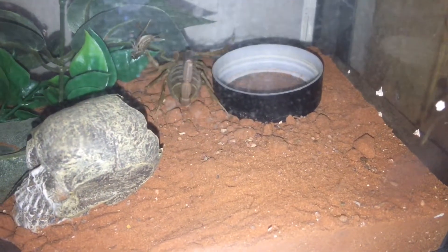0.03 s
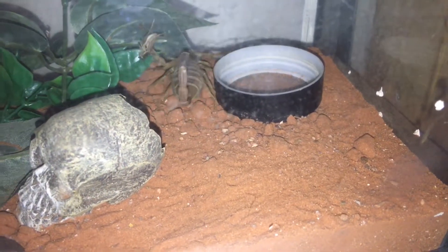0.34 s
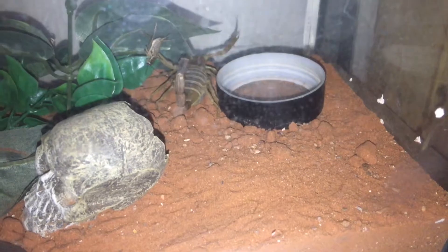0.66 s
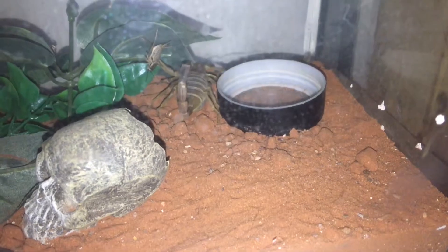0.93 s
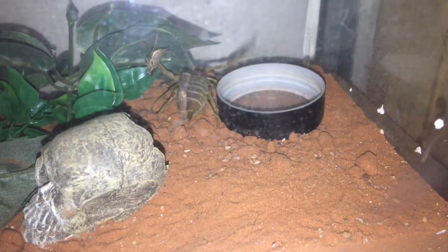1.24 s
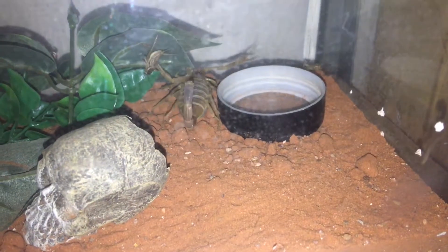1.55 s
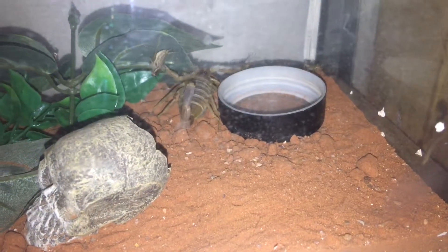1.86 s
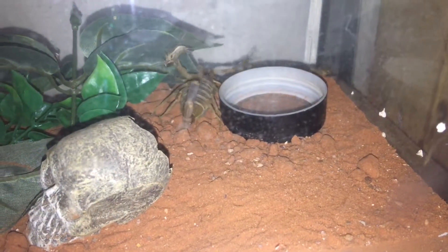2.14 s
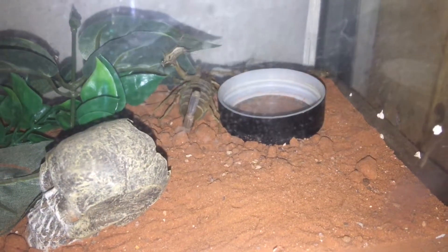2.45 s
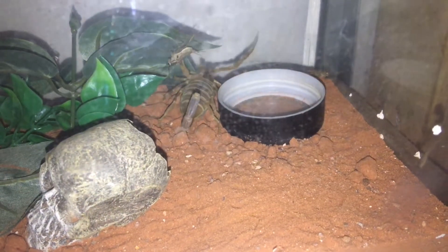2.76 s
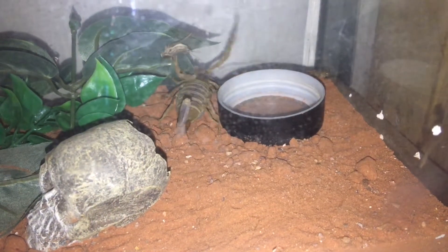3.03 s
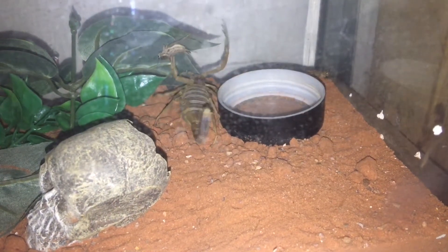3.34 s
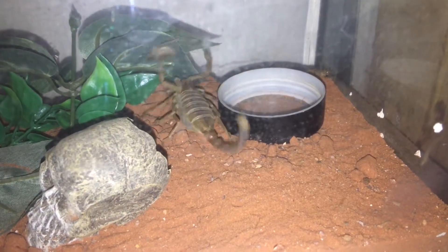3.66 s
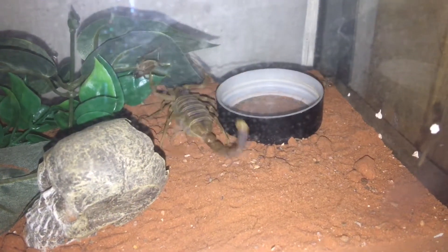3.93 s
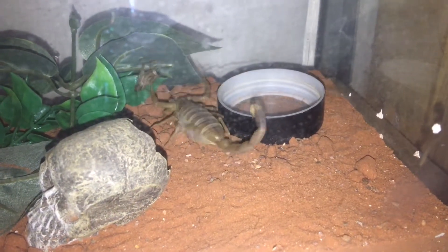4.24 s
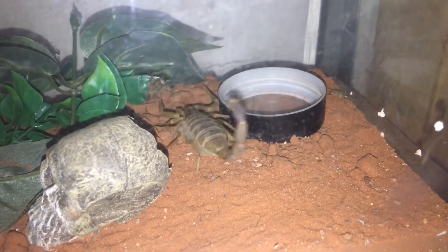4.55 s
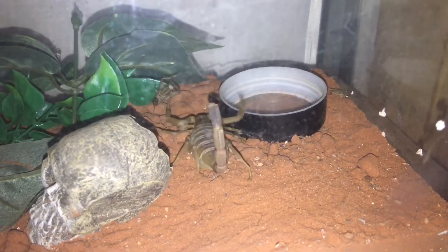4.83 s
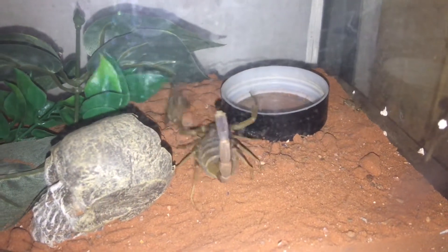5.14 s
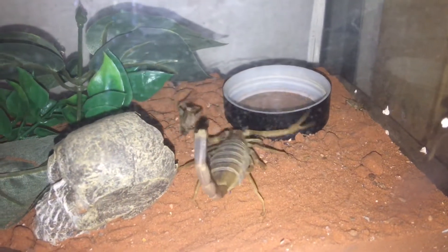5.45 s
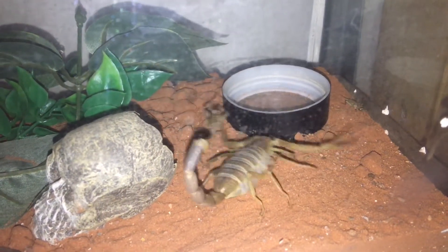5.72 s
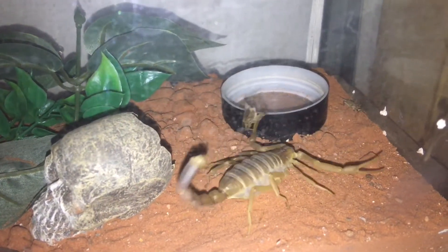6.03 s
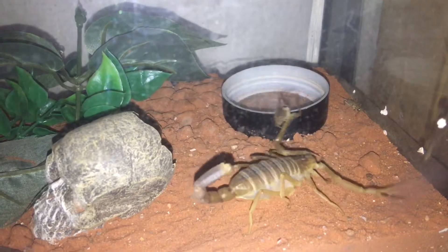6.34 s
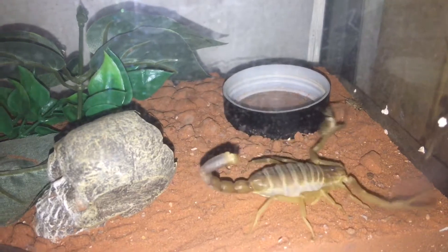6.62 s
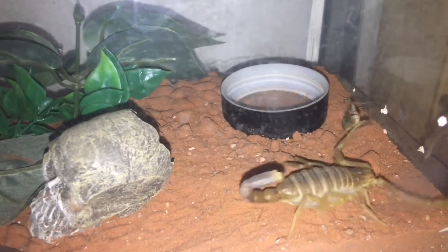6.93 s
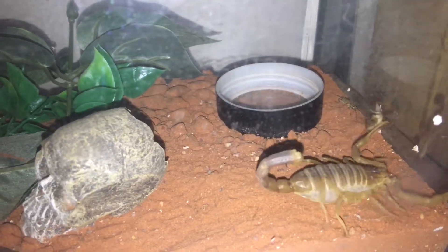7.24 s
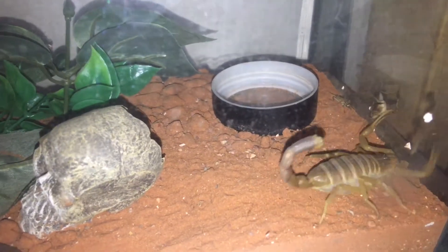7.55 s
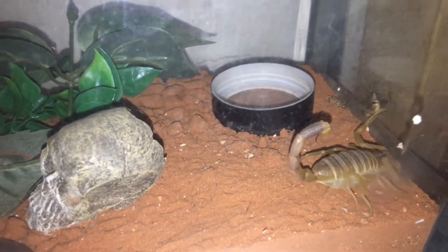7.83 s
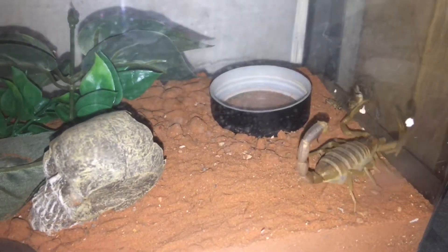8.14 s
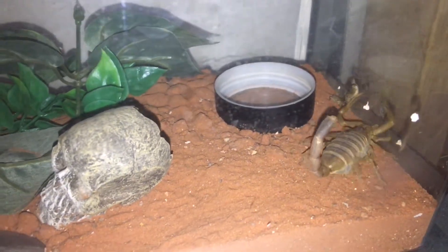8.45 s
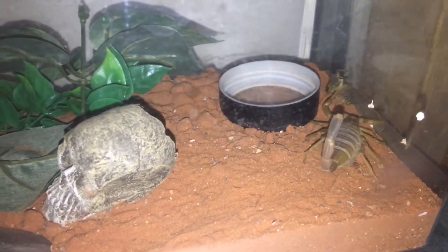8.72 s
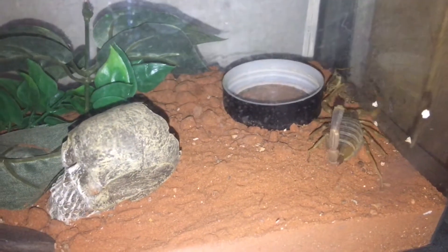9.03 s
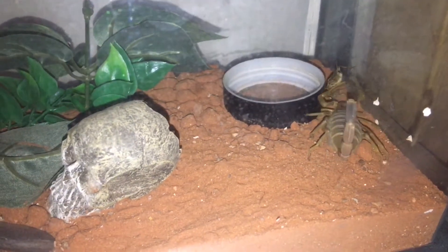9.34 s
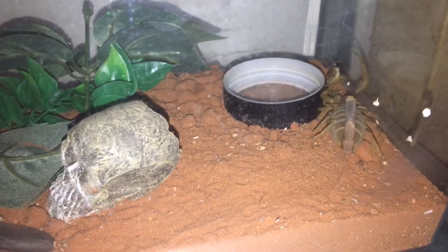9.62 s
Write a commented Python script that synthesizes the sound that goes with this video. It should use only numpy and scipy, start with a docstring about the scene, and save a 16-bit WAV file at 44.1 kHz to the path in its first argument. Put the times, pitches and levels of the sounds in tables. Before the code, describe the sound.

Faint clicks and scratches of a scorpion walking over plastic leaves and sand in a glass terrarium, under a low, throbbing motor hum.

```python
"""A motor's throbbing hum and faint whines fill a quiet room, over dull air noise and a soft electronic hiss.
A scorpion walks in a glass terrarium: its legs scrape and tap plastic leaves, a water dish and the wall,
and its body drags through dry sand. Each touch is a burst of tiny slips that makes the thing touched
resonate, and the glass walls make it linger. The electronics tick very softly, one hollow bump passes
early on, and later the claws set the dish and the wall ringing briefly."""
import sys
import numpy as np
from scipy import signal
from scipy.fft import rfft, irfft
from scipy.io import wavfile
from scipy.ndimage import uniform_filter1d

SR = 44100
rng = np.random.default_rng(int(sys.argv[2]) if len(sys.argv) > 2 else 0)


def int16_out(signal):
    """Quantize to a 16-bit WAV file."""
    q = np.round(np.clip(np.atleast_2d(signal).T, -1, 1) * 32767)
    wavfile.write(sys.argv[1], SR, q.astype(np.int16))


N = 431298
TIME = np.arange(N) / SR
MOTOR_HZ = 58.06   # how fast the motor turns

# Legs sliding along a leaf or the dish.
# Each row: start in seconds, length in seconds, relative level in dB, brightness in dB.
LEG_SLIDES = [(0.004, 0.021, -61.5, -7), (0.04, 0.017, -64, -5), (0.076, 0.072, -66, 8),
              (2.047, 0.052, -55, 7), (2.11, 0.072, -69, 3), (3.936, 0.02, -56.5, -3),
              (3.959, 0.044, -62.5, 8), (4.139, 0.044, -59, -5)]


def from_db(db):
    """Turn decibels into a number to multiply by."""
    return 10 ** (np.asarray(db) / 20)


def rms_one(x):
    """Scale a sound so that its average strength (rms) is 1."""
    return x / np.sqrt(np.mean(x ** 2) + 1e-30)


def add(out, s, sound):
    """Mix a short sound in, starting at s seconds."""
    at = int(np.clip(round(s * SR), 0, N - 1))
    out[at:at + len(sound)] += sound[:N - at]


def colour(x, spectrum):
    """Make some pitches louder and others softer, along a curve of (Hz, dB) points."""
    hz, db = np.transpose(spectrum)
    bin_hz = np.maximum(np.arange(N // 2 + 1) * SR / N, 1)
    gain = from_db(np.interp(np.log(bin_hz), np.log(hz), db))
    return irfft(rfft(x) * gain, N)


def resonate(x, hz, width_hz):
    """A resonance: pitches near hz pass and the rest are weakened."""
    r = np.exp(-np.pi * width_hz / SR)
    feedback = [1, -2 * r * np.cos(2 * np.pi * hz / SR), r * r]
    return signal.lfilter([(1 - r * r) / 2, 0, (r * r - 1) / 2], feedback, x + 1e-18)


def resonances(x, modes):
    """Several steep resonances side by side, scaled so that white noise would keep its power."""
    def through(sound):
        return sum(from_db(db) * resonate(resonate(sound, hz, 1.5 * width), hz, 1.5 * width)
                   for hz, width, db in modes)
    return through(x) / np.linalg.norm(through(signal.unit_impulse(2048)))


def tone(hz):
    """A steady, pure tone with an average strength of 1."""
    return np.sqrt(2) * np.sin(2 * np.pi * (hz * TIME + rng.random()))


def rumble(hz, width_hz):
    """Random shaking in one resonance makes a wavering pitch."""
    noise = resonate(resonate(rng.standard_normal(N + SR), hz, width_hz), hz, width_hz)
    return rms_one(noise[SR:])   # skip the second in which it builds up


def even_out(x):
    """Smooth a sound's loudness while its pitch keeps wavering."""
    power = uniform_filter1d(np.abs(signal.hilbert(x)) ** 2, size=2600)
    return rms_one(x / np.sqrt(power + .04 * power.mean()))


def motor_hum(hum_db=-1.0, shake_db=-6.0, flutter_db=-5.5, octave_db=-52.0, octave_follows=0.79):
    """The motor's tone swells and sinks, throbbing against its own rumble; a higher rumble follows."""
    # The swells of the deep hum. Each row: time in seconds, relative level in dB.
    swells = [(0.02, -40), (0.07, -37.5), (1.23, -43), (1.26, -52), (1.4, -35.5), (1.67, -45.5),
              (1.77, -36.5), (1.96, -43), (2.83, -40.5), (2.88, -38), (3.61, -41.5), (3.67, -48),
              (4.34, -33.5), (4.88, -47.5), (5.07, -38), (5.18, -46), (5.37, -35.5), (5.5, -36.5),
              (5.61, -58.5), (5.75, -35.5), (6.23, -44.5), (6.58, -37.5), (6.64, -62), (6.74, -41.5),
              (7.21, -40), (7.31, -54), (7.37, -36.5), (8.28, -46.5), (8.31, -36.5), (8.83, -35),
              (8.96, -44), (9.07, -34.5), (9.48, -43), (9.72, -44)]
    level_db = np.interp(TIME, *np.transpose(swells))
    core = even_out(tone(MOTOR_HZ) + from_db(shake_db) * rumble(hz=60.0, width_hz=14.3))
    flutter = from_db(flutter_db) * rumble(hz=56.46, width_hz=14.5)
    low = from_db(hum_db + level_db) * (core + flutter)
    high_db = octave_db + octave_follows * (level_db - level_db.mean())
    high = from_db(high_db) * rumble(hz=112.35, width_hz=23.4)
    return signal.sosfilt(signal.butter(4, [41, 140], "band", fs=SR, output="sos"), low + high)


def whines(buzz_db=-103, buzz_spread_db=1.5, top_hz=4528.7):
    """The motor sings at multiples of its turning rate (harmonics), among other steady tones."""
    # The clear harmonics. Each row: multiple of the turning rate, level in dB.
    harmonics = [(2, -56), (10, -90), (14, -85), (15, -86.5), (16, -86.5), (18, -86), (21, -80.5),
                 (22, -84), (23, -94), (26, -95), (28, -93), (30, -94), (47, -88.5), (71, -94)]
    # Mains hum and other tones; the low ones throb against the second harmonic.
    # Each row: pitch in Hz, level in dB.
    other_tones = [(98.95, -64), (110.2, -56.6), (120, -64), (643.3, -82), (716.7, -81.5), (1075.3, -87)]
    # The highest whine slowly grows. Each row: time in seconds, level in dB.
    top_levels = [(0, -86.5), (4, -86.5), (6, -85.5), (9.7, -82)]
    upper = np.arange(24, 78)   # these harmonics make a faint, uneven buzz
    upper_db = buzz_db + buzz_spread_db * np.clip(rng.standard_normal(len(upper)), -2, 2)
    levels = dict(zip(upper, upper_db)) | dict(harmonics)
    steady = sum(from_db(db) * tone(multiple * MOTOR_HZ) for multiple, db in levels.items())
    steady += sum(from_db(db) * tone(hz) for hz, db in other_tones)
    return steady + from_db(np.interp(TIME, *np.transpose(top_levels))) * tone(top_hz)


def air_and_hiss(air_top_hz=5000):
    """Dull room air drones in a few resonances, and the electronics hiss above it."""
    # The room's air noise. Each row: pitch in Hz, level in dB per Hz.
    air_curve = [(20, -86.5), (40, -74.5), (80, -74), (100, -73.5), (150, -86.5), (200, -88.5), (235, -94),
                 (450, -97.5), (720, -96.5), (1400, -102.5), (2200, -105.5), (2900, -109), (4300, -111),
                 (5000, -113.5)]
    # Resonances in that noise. Each row: pitch in Hz, width in Hz, level in dB.
    air_modes = [(198.6, 17.5, -75.5), (255.3, 8.6, -81.5), (341, 110, -79.5), (560.5, 13, -80.5),
                 (722.6, 30, -78), (1223, 18, -85), (2060, 110, -86.5)]
    # The electronic hiss. Each row: pitch in Hz, level in dB per Hz.
    hiss_curve = [(4000, -135), (5300, -115), (6700, -114.8), (7600, -118), (9400, -116.8), (10500, -122.5),
                  (11200, -119.3), (12200, -117.5), (13200, -113.5), (14300, -115.6), (16000, -116.2)]
    air, hiss = rng.standard_normal((2, N)) * np.sqrt(SR / 2)
    air = signal.sosfilt(signal.butter(6, air_top_hz, fs=SR, output="sos"), colour(air, air_curve))
    drone = sum(from_db(db) * rumble(hz, width) for hz, width, db in air_modes)
    return air + drone + colour(hiss, hiss_curve)


def grains(per_s, spread_db, size):
    """Tiny slips of uneven strength at random moments."""
    slips = rng.random(size) < per_s / SR
    direction = rng.choice([-1, 1], size)
    strength = from_db(spread_db * np.clip(rng.standard_normal(size), -2, 2))
    return rms_one(slips * direction * strength)


def glass_echo(envelope, fade_s=0.089, echo_db=1.0):
    """Sound bouncing between the glass walls leaves a noisy tail that drops 60 dB in fade_s."""
    power_kept = from_db(-120 / (fade_s * SR))
    power = signal.lfilter([1 - power_kept], [1, -power_kept], envelope ** 2)
    return from_db(echo_db) * np.sqrt(power) * rng.standard_normal(len(envelope))


def touched_spot(sound, count=10, range_hz=(1454, 14030), width_hz=116, boost_db=6):
    """Each spot that a leg touches favours a few chance pitches; the sound keeps its energy."""
    pitches = np.exp(rng.uniform(*np.log(range_hz), count))
    rung = sound + from_db(boost_db) * sum(resonate(sound, hz, width_hz) for hz in pitches)
    return rung * np.linalg.norm(sound) / np.linalg.norm(rung)


def scrapes(levels_db, lowest_hz=5170):
    """A sliding leg catches, slips in quick grains and lets go, too light to stir low pitches."""
    out, t = np.zeros(N), TIME[:SR // 6]
    for (s, length, *_), db in zip(LEG_SLIDES, levels_db):
        stroke = np.interp(t / length, [0, .06, .85, 1.15], [0, 1, .8, 0], right=0)
        friction = stroke * grains(per_s=4600, spread_db=4.0, size=len(t))
        add(out, s, from_db(db) * touched_spot(friction + glass_echo(stroke)))
    return signal.sosfilt(signal.butter(6, lowest_hz, "high", fs=SR, output="sos"), out)


def sand(gain_db=10.0, coarse_db=-7.0):
    """Fine sand and a few coarser crumbs roll under the body in soft swells."""
    # The body's drags. Each row: start in seconds, length in seconds, relative level in dB.
    drags = [(0.048,0.096,-79), (0.293,0.035,-82), (1.21,0.11,-83), (1.355,0.18,-77), (7.234,0.18,-79),
             (9.077,0.3,-78.5)]
    # The tone colour of sliding sand. Each row: pitch in Hz, relative level in dB.
    sand_curve = [(400, 13), (1500, 17), (4000, 11), (6500, 9.5), (9000, 7.5), (10500, 4.5), (13000, 7),
                  (15800, -13)]
    push = sum(from_db(db) * np.exp(-(2 * (TIME - s) / length - 1) ** 2) for s, length, db in drags)
    fine = grains(per_s=5200, spread_db=3.5, size=N)
    coarse = from_db(coarse_db) * grains(per_s=540, spread_db=24.0, size=N)
    return from_db(gain_db) * push * rms_one(colour(fine + coarse, sand_curve))


def ticks(starts_s=(.1917, .7928), period_s=1.0041, pulse_db=-42.0):
    """The electronics tick twice in every period: bright blips, under a millisecond long."""
    pulses = np.zeros(N)
    for start in starts_s:
        for s in np.arange(start, N / SR, period_s):
            add(pulses, s, from_db([pulse_db]))
    return resonances(pulses, [(13700, 2400, 0)])   # pitch in Hz, width in Hz, dB


def footfalls(faint_per_s=2.5, faint_db=(-97.75, -92.75), faint_decay_s=.004):
    """List when and how the legs land: the clear taps, plus faint steps at random moments."""
    # The clear taps; leaves are bright, the dish and the wall dull.
    # Each row: start in seconds, relative level in dB, brightness in dB, decay time in seconds.
    clear_taps = [(0.202, -69, 8, .004), (0.6483, -60, -2.5, 0.0032), (1.151, -67, 0, .005),
                  (1.8325, -64, 4, 0.0068), (1.925, -63.5, 1, .005), (2.053, -61, 7, .003),
                  (2.082, -51.5, 10, .006), (2.204, -64.5, -7.5, 0.0031), (2.476, -67, 8, .004),
                  (2.502, -72, 12, .004), (2.5355, -65, 0, 0.0036), (2.979, -73, 23, .004),
                  (3.128, -59, 3, .0033), (3.155, -62, 6, .0034), (3.176, -66, 0, 0.0036),
                  (3.201, -61, 14, .003), (3.2125, -56.5, 7, .0055), (3.2675, -60, 6, 0.0036),
                  (3.357, -65, 7, .003), (3.418, -58.5, 12, 0.0045), (3.528, -59.5, 7, 0.0023),
                  (3.7406, -61.5, 6, 0.0026), (3.8, -66, 3, .005), (3.838, -67, 6, .0044),
                  (3.877, -66, 6, .004), (5.192, -72, -6.5, 0.0037), (5.599, -71.5, 24, .004),
                  (6.65, -72, -3, 0.0036), (6.998, -71, -6, 0.0046), (7.029, -65, 18, .0008),
                  (7.0505, -63, -3, 0.0019), (7.067, -85, -11, .002), (7.818, -72, -9, .0034),
                  (8.031, -68, -1, .004), (8.65, -72, 19, .0034), (8.815, -63.5, -4, 0.0076),
                  (9.132, -74, -7, .006)]
    count = int(faint_per_s * N / SR)
    when, strength, brightness = rng.random((count, 3)).T
    level_db = np.interp(strength, [0, 1], faint_db)
    faint = [when * N / SR, level_db, 10 * (brightness - .5), np.full(count, faint_decay_s)]
    return np.vstack([clear_taps, np.transpose(faint)])


def taps(times, decays, levels_db):
    """A claw lands with a crack that chatters out within milliseconds."""
    out, t = np.zeros(N), TIME[:SR // 8]
    for s, decay, db in zip(times, decays, levels_db):
        crack = np.exp(-t / max(decay, .0005))
        crack /= np.sqrt(np.sum(crack ** 2) / (.008 * SR))   # as much energy as 8 ms at strength 1
        chatter = grains(per_s=12000, spread_db=3.0, size=len(t))
        add(out, s, from_db(db) * touched_spot(crack * chatter + glass_echo(crack)))
    return out


def legs(knock_db=-3.5, click_db=-7.0, fizz_db=-6.5, knock_loss=1.29, fizz_gain=0.47):
    """Taps and scrapes make things resonate; a brighter touch has less knock and more fizz."""
    # The low (knock), middle (click) and top (fizz) resonances of the things touched.
    # Each row: pitch in Hz, width in Hz, relative level in dB.
    knock_modes = [(1040, 560, 15.5), (1990, 1000, 10.5), (3330, 2100, 3.5)]
    click_modes = [(5900, 5700, 7), (6600, 840, 5.5), (7970, 1300, 2), (8950, 1000, 2.5)]
    fizz_modes = [(12200, 2100, -12.5), (13440, 1600, -7), (14400, 980, -8.5)]
    times, tap_db, tap_brightness, decays = footfalls().T
    _, _, scrape_db, scrape_brightness = np.transpose(LEG_SLIDES)
    knock = taps(times, decays, tap_db - knock_loss * tap_brightness)
    click = taps(times, decays, tap_db) + scrapes(scrape_db)
    fizz = taps(times, decays, tap_db + fizz_gain * tap_brightness)
    fizz += scrapes(scrape_db + fizz_gain * scrape_brightness)
    return (from_db(knock_db) * resonances(knock, knock_modes)
            + from_db(click_db) * resonances(click, click_modes)
            + from_db(fizz_db) * resonances(fizz, fizz_modes))


def bump(peak_s=1.45, width_s=.06, hz=198, db=-56.5):
    """One soft, hollow bump: a low tone swells and fades."""
    swell = np.exp(-((TIME - peak_s) / width_s) ** 2)
    return from_db(db) * swell * even_out(rumble(hz, width_hz=13))


def rings():
    """Touched by a claw, the hard dish and wall ring on as pure tones that die away."""
    # Each row: start in seconds, pitch in Hz, peak level in dB, seconds to fade by 60 dB.
    ringing_tones = [(5.19, 2790, -61, .075), (7.0505, 5550, -56, .02), (7.8195, 2080, -55, .04),
                     (7.8195, 2350, -58, .035), (7.8195, 2620, -56, .035), (7.8195, 3200, -55, .04),
                     (7.883, 2120, -65, .04), (7.883, 2620, -63, .04), (8.03, 3460, -66, .1),
                     (8.817, 4100, -55, .012), (9.132, 3460, -66, .1)]
    out, t = np.zeros(N), TIME[:SR // 4]
    for s, hz, db, fade_s in ringing_tones:
        add(out, s, from_db(db - 60 * t / fade_s) * np.sin(2 * np.pi * hz * t))
    return out


def scene():
    """Mix the animal in its tank with the room around it, in one channel."""
    animal = legs() + rings() + sand()
    room = bump() + motor_hum() + whines() + air_and_hiss()
    return (animal + room + ticks())[None]


def record(dry, cutoff_hz=15750):
    """Cut away the very highest pitches steeply."""
    return signal.sosfilt(signal.ellip(10, .1, 70, cutoff_hz, fs=SR, output="sos"), dry)


dry = scene()
out = record(dry)
int16_out(out)
```